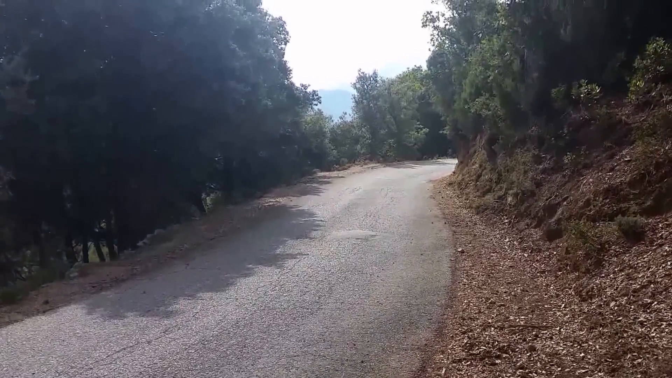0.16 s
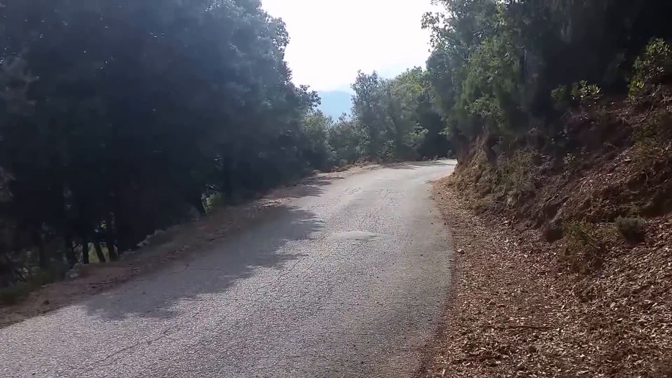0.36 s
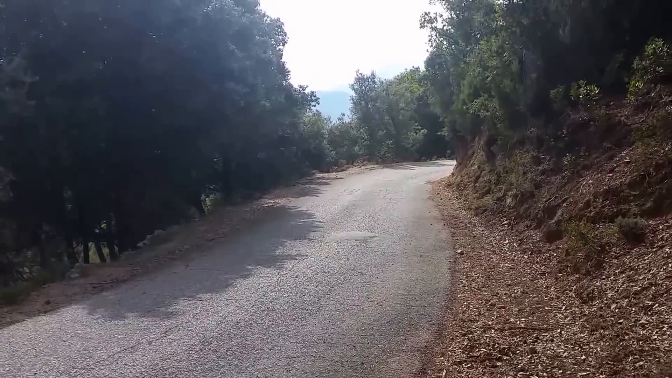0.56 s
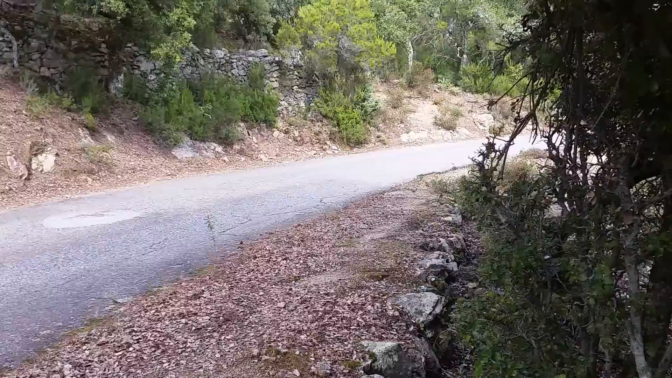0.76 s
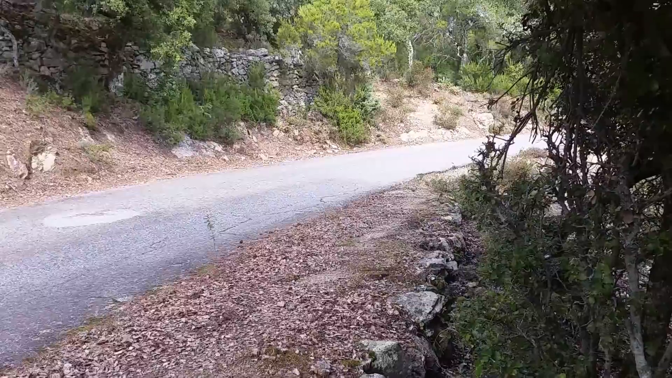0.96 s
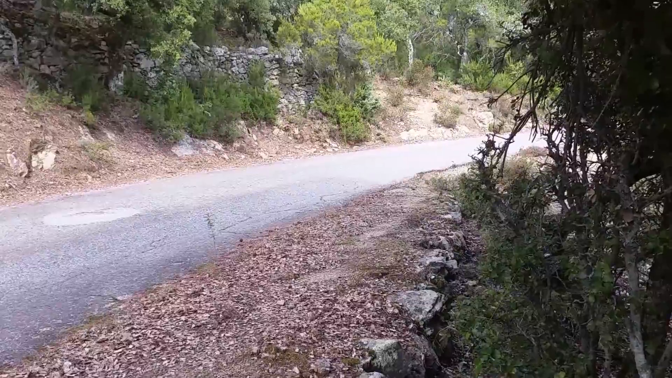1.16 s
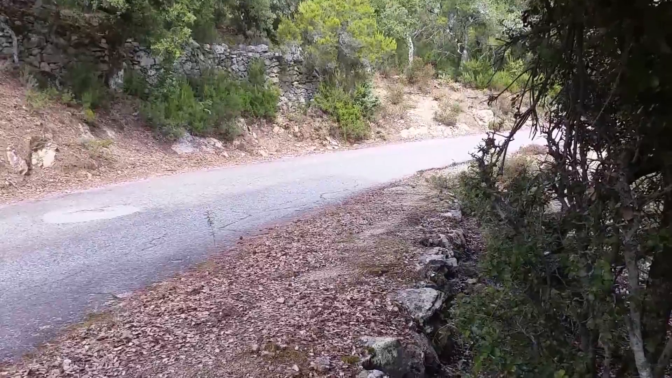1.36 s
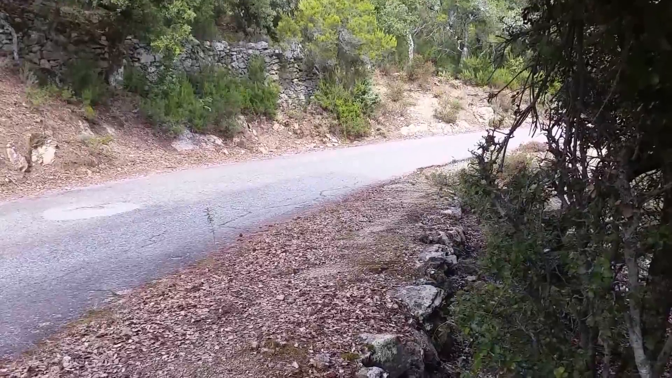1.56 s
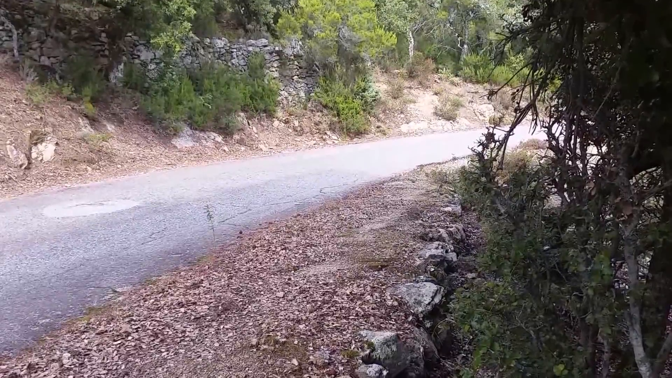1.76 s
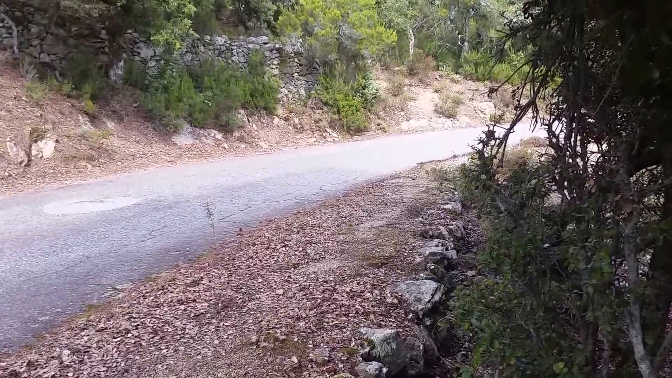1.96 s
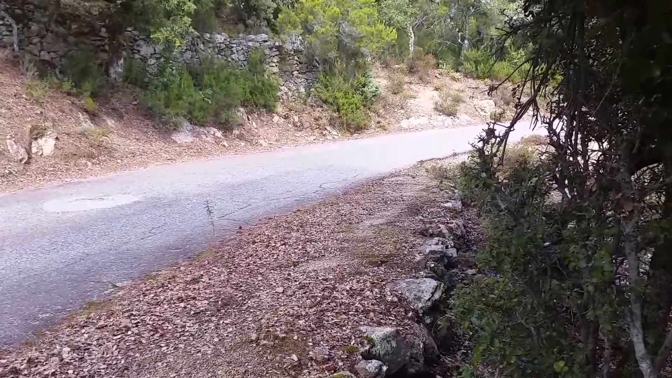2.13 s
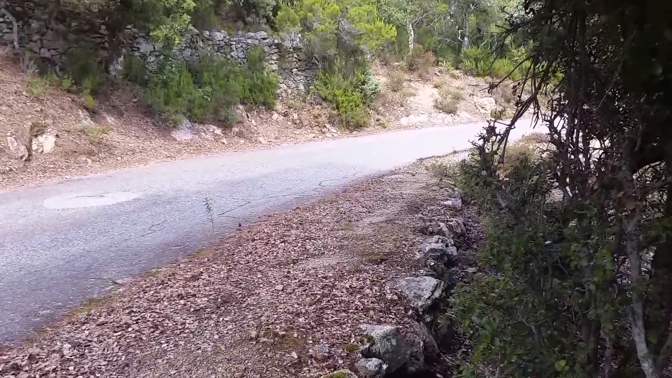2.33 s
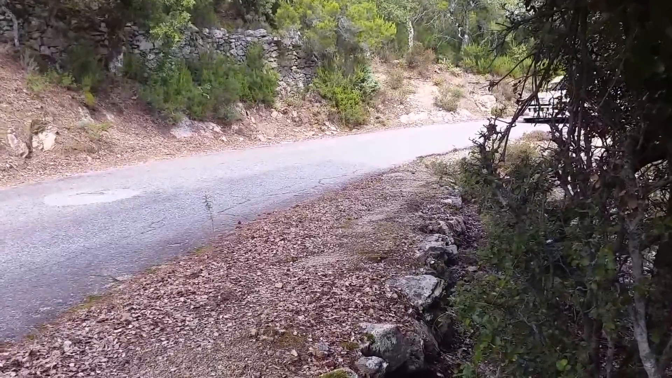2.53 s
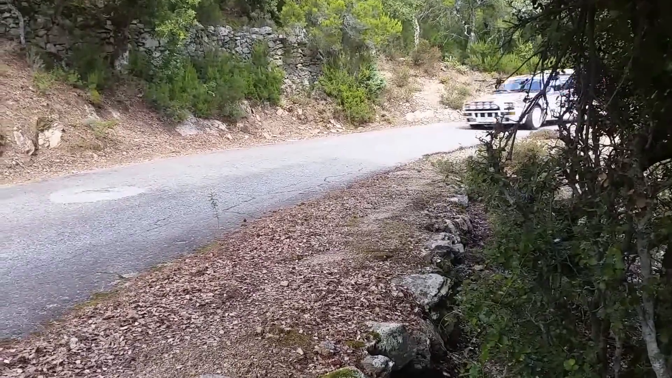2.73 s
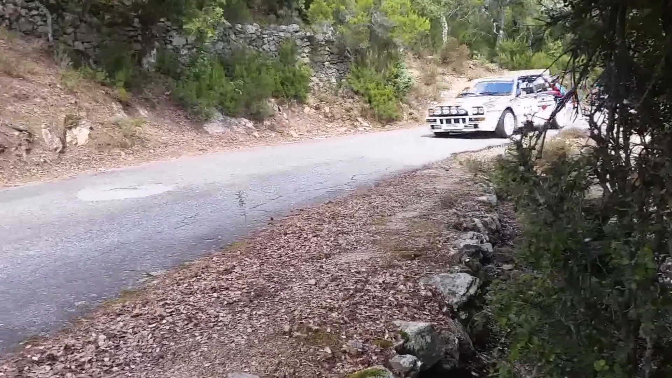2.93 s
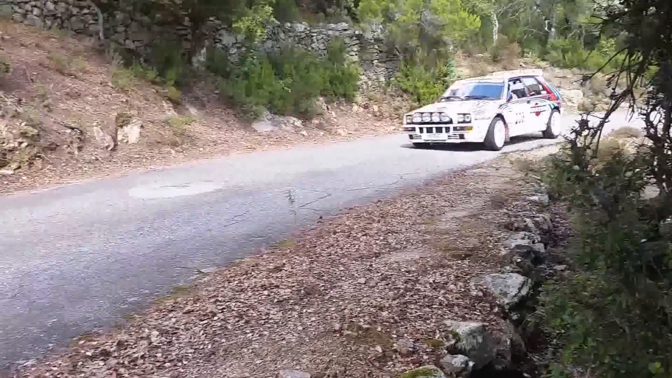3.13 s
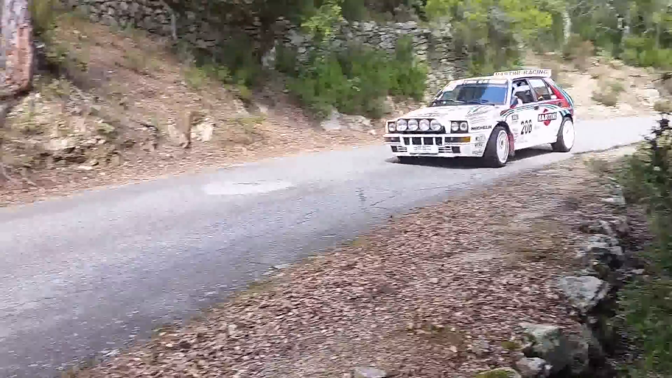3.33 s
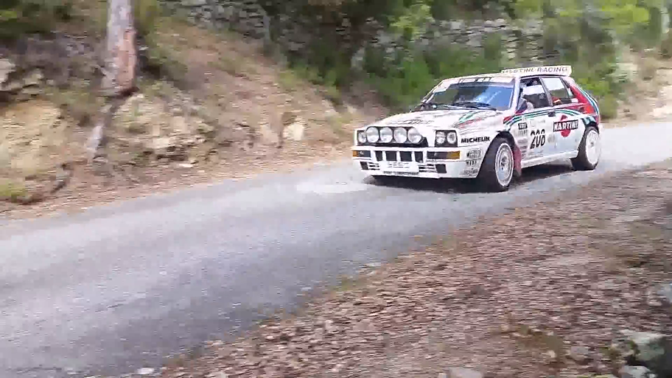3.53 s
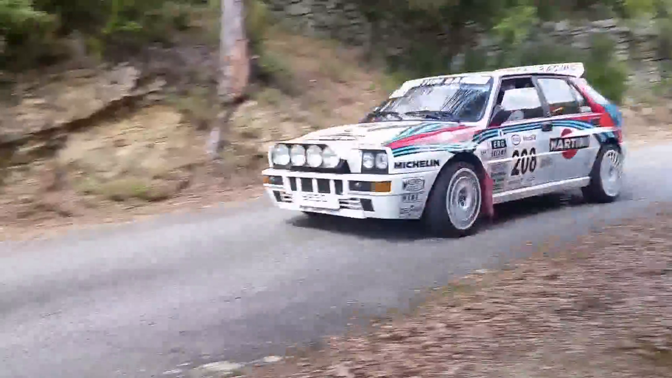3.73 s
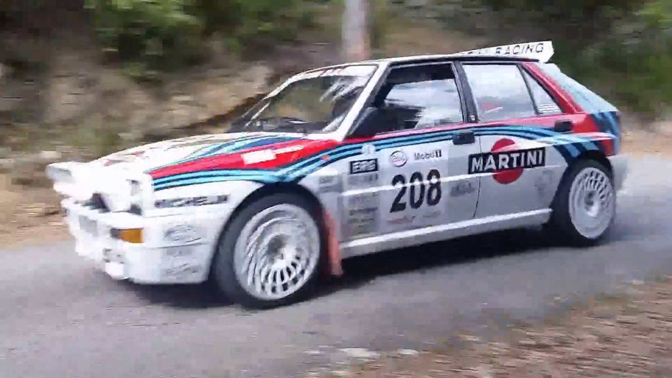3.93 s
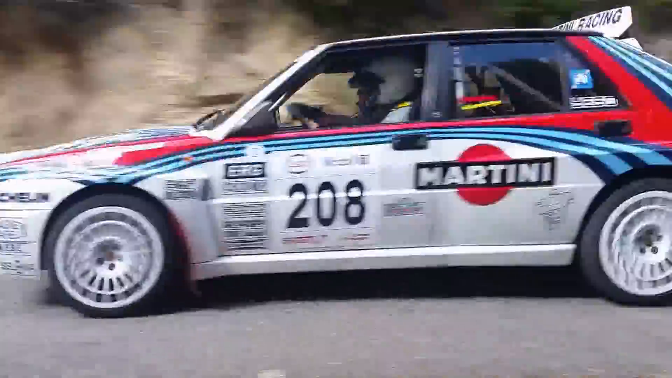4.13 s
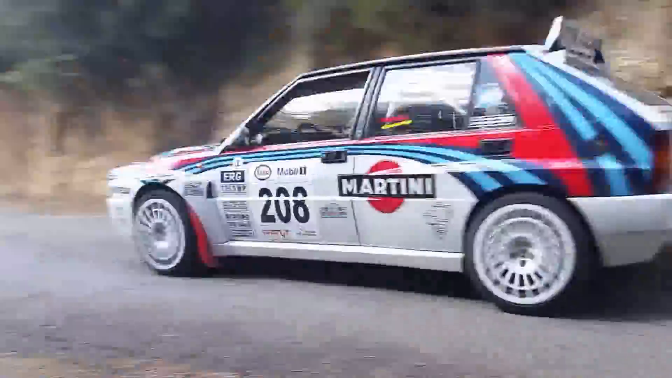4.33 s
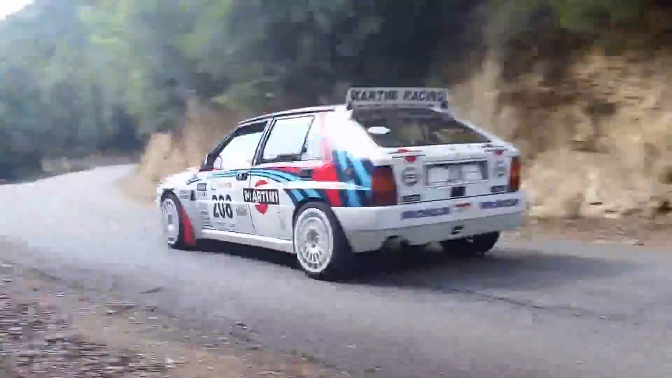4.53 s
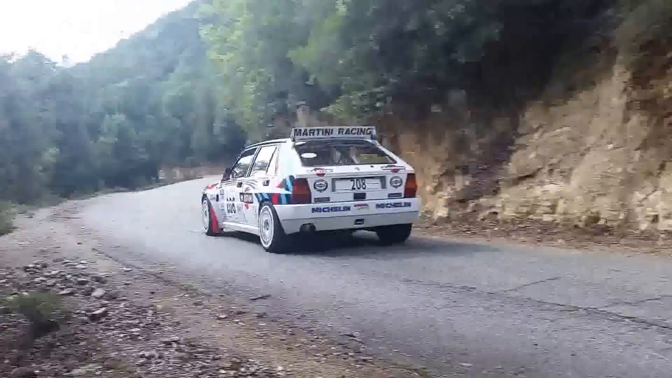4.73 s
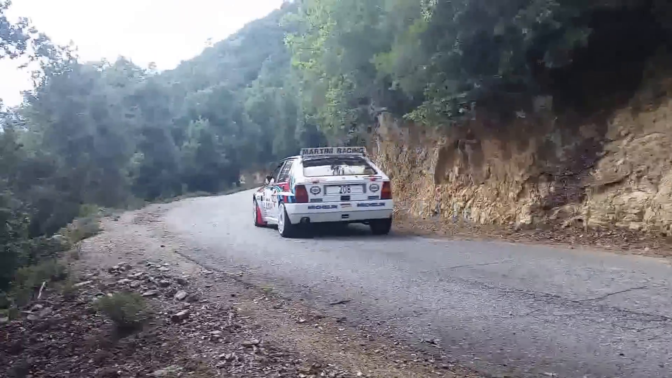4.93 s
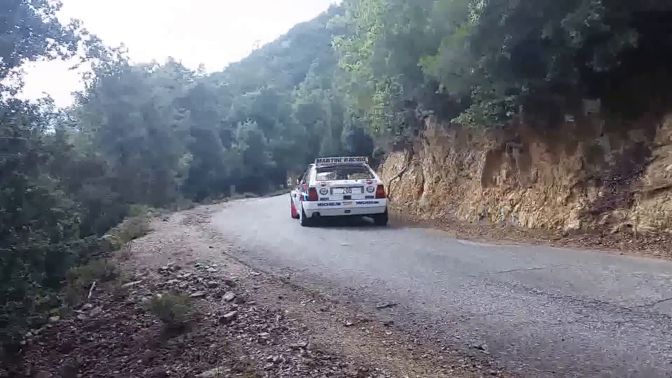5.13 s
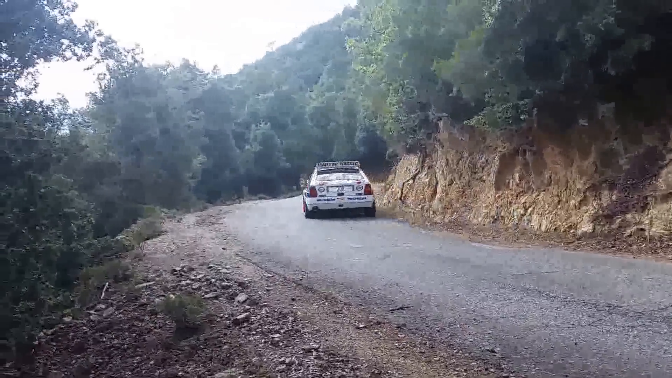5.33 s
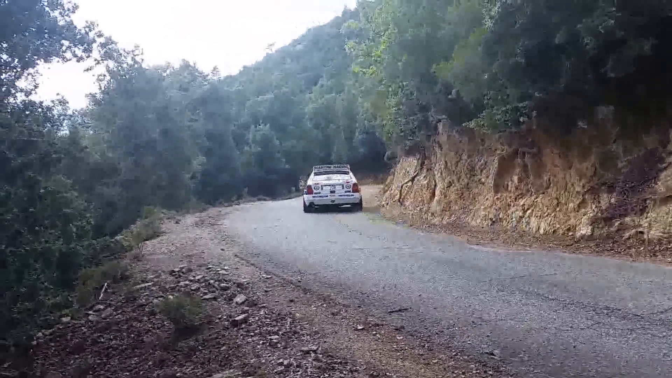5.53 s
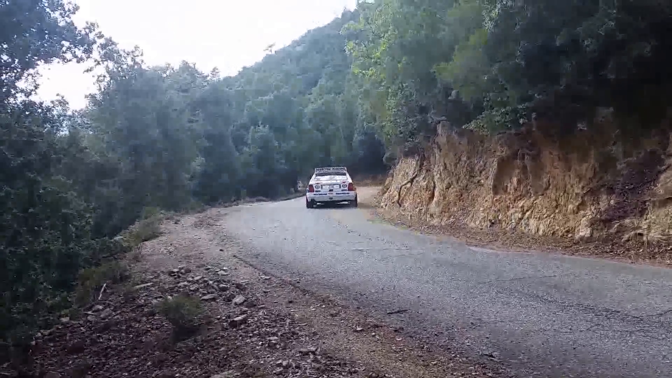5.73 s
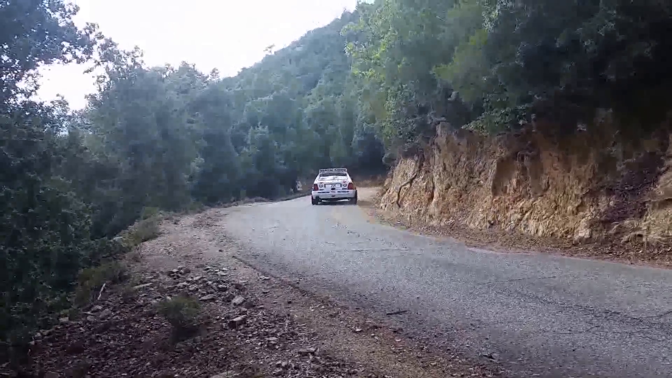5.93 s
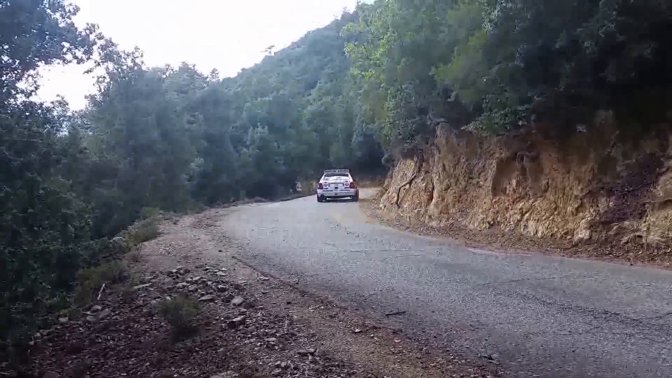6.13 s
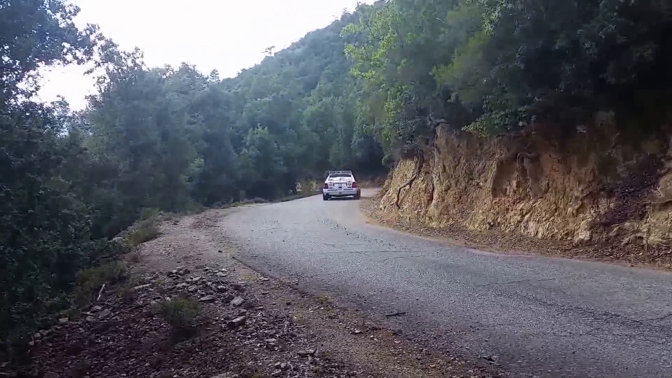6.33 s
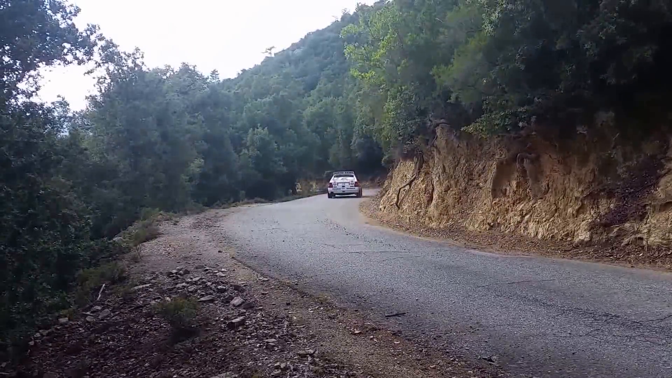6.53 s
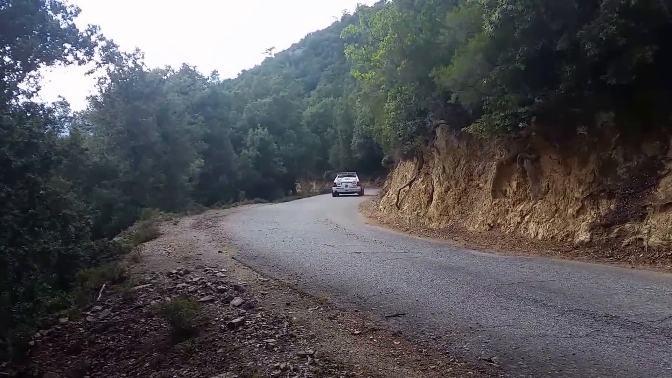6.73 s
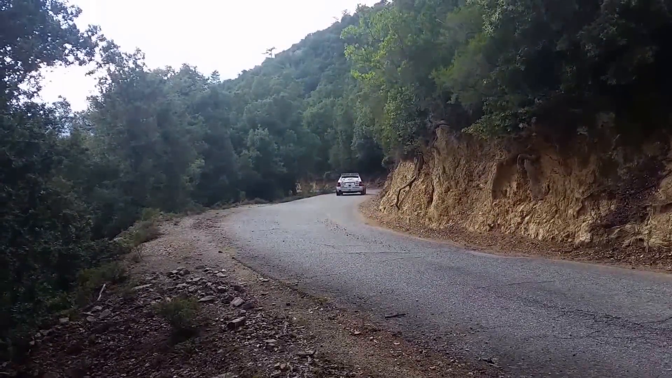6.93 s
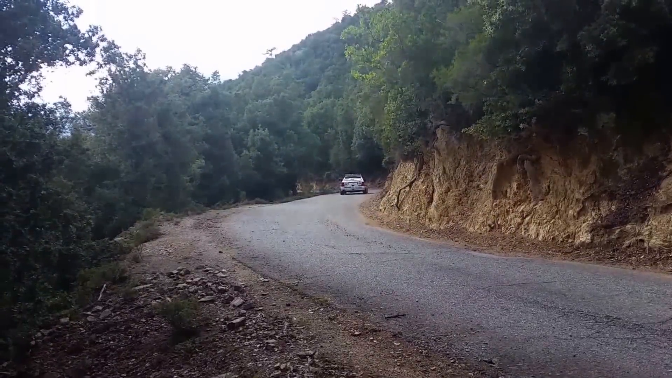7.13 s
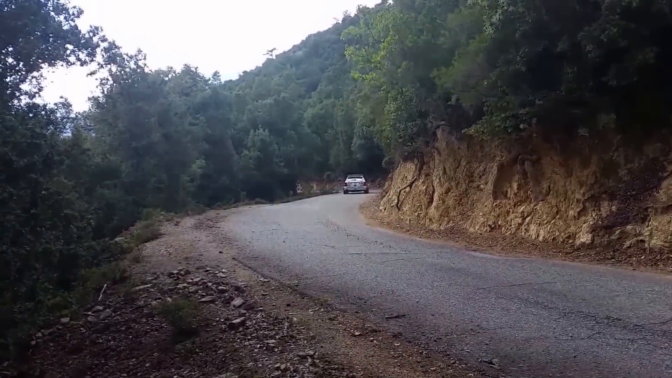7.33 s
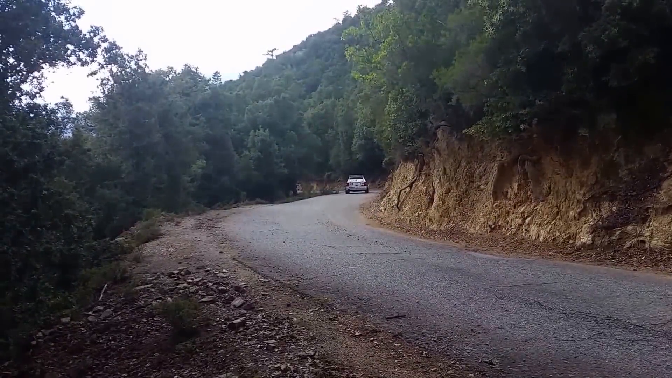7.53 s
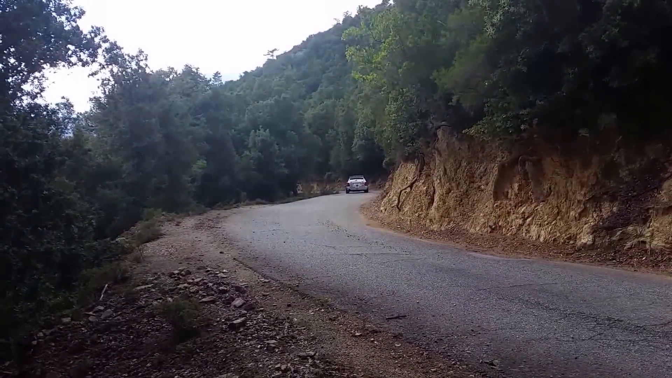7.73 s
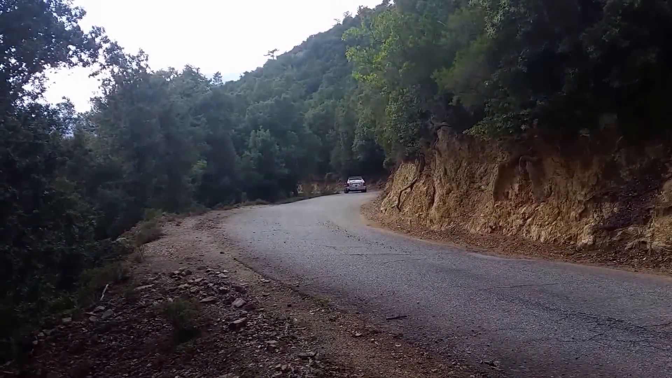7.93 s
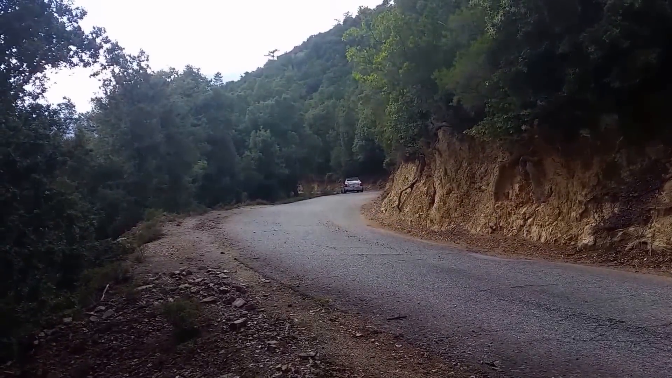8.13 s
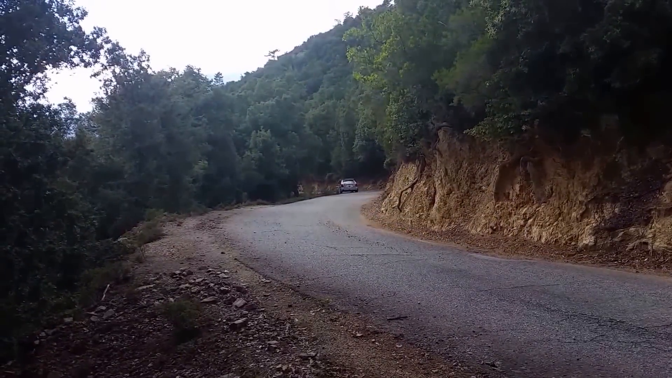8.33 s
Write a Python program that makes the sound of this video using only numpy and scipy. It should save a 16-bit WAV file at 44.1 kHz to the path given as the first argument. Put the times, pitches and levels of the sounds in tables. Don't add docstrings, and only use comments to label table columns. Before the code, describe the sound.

Raspy four-cylinder rally engine fading, a short silence, then another growls nearer, sweeps past with popping exhaust and tyre hiss, and drones off among trees.

```python
import sys
import numpy as np
from scipy import signal
from scipy.fft import rfft, irfft, next_fast_len
from scipy.io import wavfile
from scipy.ndimage import uniform_filter1d

SR = 44100
rng = np.random.default_rng(int(sys.argv[2]) if len(sys.argv) > 2 else 0)


def volts_from_db(level):
    exponent = np.asarray(level, float) / 20
    return 10 ** exponent


def generate_wav(signal):
    frames = np.transpose(np.atleast_2d(signal))
    scaled = np.clip(frames, -1, 1) * 32767
    pcm = np.round(scaled).astype(np.int16)
    wavfile.write(sys.argv[1], SR, pcm)


N = 373956
T = np.arange(N) / SR

# start/s, end/s
CUT_S = (.667, 1.)
# start/s, end/s
ABREAST_S = (3.9, 4.5)
CYLINDERS_DB = [5, -10, -15.5, -7, 7.5, 6.5, -23.5, -2.5]
# t/s, level/dB, fullness of low orders/dB, road echo swing from first to second order/dB
FIRST_DRIVE = [(0, -27, 6, -0.5), (.16, -32, 6, -0.5), (.24, -33.5, 3.5, 1), (.43, -37.5, 3.5, -1.5),
               (.5, -34.5, 0, 0), (.667, -33.5, 2.5, -4)]
SECOND_DRIVE = [(1.08, -40, 7.5, -3.5), (1.29, -29.5, 1.5, -9.5), (1.7, -29.5, 3, -7),
                (2.5, -23.5, 2.5, -3), (2.85, -26, 4, -9), (3.1, -24.5, 6.5, -2), (3.55, -18, 0.5, 0),
                (4.05, -17, 3, -3.5), (4.35, -13.5, -2, 1), (4.73, -16, 1, -1), (5.3, -19, 1.5, 5),
                (5.68, -22.5, 1.5, 2), (5.75, -24, 2.5, -4), (6.18, -23.5, -2, -5.5), (6.44, -20, -10, -10),
                (7.0, -20, -8, -6), (7.25, -21, -4, 6.5), (8.48, -26.5, -1.5, .5)]
# f/Hz, correlation/1
SAME = [(60, 0.99), (150, 0.97), (380, 0.94), (950, 0.8), (2380, 0.56), (5980, 0.2), (15000, -0.03)]


def smoothed(x, span):
    return uniform_filter1d(uniform_filter1d(x, span), span)


def evened(x, span=None):
    power = smoothed(x ** 2, span) if span else np.mean(x ** 2)
    return x / np.sqrt(abs(power) + 1e-20)


def read(points, hz):
    f, value = np.transpose(points)
    return np.interp(np.log(hz + 1), np.log(f + 1), value)


def columns(*tables):
    s, *cols = np.transpose(np.concatenate(tables))
    return np.array([np.interp(T, s, c) for c in cols])


def bump(s, half_s):
    near = slice(max(round((s - 3 * half_s) * SR), 0), round((s + 3 * half_s) * SR))
    return near, np.exp(-((T[near] - s) / half_s) ** 2)


def likened(left, other, same):
    return np.array([left, same * left + np.sqrt(1 - same ** 2) * other])


def pair(frames, hz):
    a, b, c, d = rng.standard_normal((frames, len(hz), 4)).T
    same = np.clip(read(SAME, hz), -1, 1)[:, None]
    return likened(a + 1j * b, c + 1j * d, same)


def resonate(x, hz, width_hz):
    turn = np.exp(2j * np.pi * np.cumsum(hz) / SR)
    r = np.exp(-np.pi * width_hz / SR)
    return 2 * (turn * signal.lfilter([1 - r], [1, -r], x / turn)).real


def cranked():
    # t/s, f/Hz
    first_rate = [(0, 119.7), (.15, 122), (.67, 124.4)]
    second_rate = [(1.0, 105.7), (1.3, 104.0), (2.15, 101.2), (2.35, 102.4), (2.65, 106.3), (2.95, 106.0),
                   (3.2, 104.0), (3.85, 103.6), (4.1, 102.2), (4.33, 103.9), (4.68, 100.8), (5.5, 109.2),
                   (5.9, 110.0), (6.1, 108.8), (6.85, 107.2), (7.0, 106.1), (7.45, 107.7), (8.48, 115.9)]
    # t/s, half length/s, added rate/Hz
    twitch = [(1.44, 0.061, 1), (2.221, 0.0493, 2.5), (2.43, 0.0608, 2.5), (2.876, 0.0696, 2),
              (3.303, 0.098, .5), (3.493, 0.02934, 8), (4.371, .04, 2.5), (4.483, 0.0387, -3.5),
              (5.385, .08, 1), (5.778, .06, -5), (5.923, .04, 1.5), (6.03, .04, -1.5), (7.268, .05, 4),
              (7.521, 0.062, 1.5), (7.722, 0.039, 0.5)]
    hz = columns(first_rate, second_rate)[0]
    for s, half_s, extra_hz in twitch:
        near, shape = bump(s, half_s)
        hz[near] += extra_hz * shape
    return np.cumsum(hz) / SR


def firings():
    strong_firing_s = [.516, 6.676]
    turns = cranked()
    first, second = (turns[round(s * SR)] for s in strong_firing_s)
    count = np.floor(turns - np.where(T < CUT_S[0], first, second)).astype(int)
    at = np.flatnonzero(np.diff(count) == 1) + 1
    return at, count[at] % 4 + 4 * (T[at] > CUT_S[0])


def spells():
    # start/s, cylinder imbalance/1, misfire scatter/dB, share by way of bank and trees/1
    running = [(0, 1, 3.5, .55), (.215, .1, 1, .6), (.465, 1.4, 1, .62), (.8, .3, 3.8, .8),
               (2.78, .2, 2.2, .75), (3.43, .4, 5.5, .52), (4.3, .25, 1.6, .48), (4.8, .3, 1.2, .4),
               (5.68, .55, 1.4, .5), (6.3, .5, 5, .52), (6.45, .8, 3, .35), (6.54, 1.1, .5, .12),
               (6.95, .4, 2, .43), (7.23, .22, 1, .6)]
    change_s = .05
    s, *cols = np.transpose(running)
    held = np.array(cols)[:, np.searchsorted(s, T, "right") - 1]
    return uniform_filter1d(held, round(change_s * SR))


def levels():
    # t/s, level/dB
    rasp = [(0, -10.5), (.4, -9.5), (.66, -15), (1.2, -11), (2.6, -7), (3, -4), (4, -8.5), (4.4, -15),
            (4.75, -12), (5.2, -9), (6.4, -8), (6.9, -4), (7.2, -6), (7.6, -2), (8.48, -2.5)]
    # t/s, half length/s, first order/dB, second order/dB
    beats = [(0.09, 0.039, -1.5, -10.5), (0.515, 0.04, 9, -4), (1.164, 0.077, -0.5, -1.5),
             (1.483, 0.071, -8, -2.5), (1.544, 0.023, 8.5, 6.5), (1.599, 0.064, -2.5, -12),
             (1.828, 0.054, 3, 0), (2.088, 0.078, 1, -3.5), (2.22, 0.041, -3.5, 9), (2.359, 0.018, 4, -38),
             (2.543, 0.026, 5, -7), (2.633, 0.093, -7, -1.5), (2.987, 0.022, -6.5, 4),
             (3.05, .03, -3.5, -6), (3.447, 0.051, -12, 1.5), (3.498, 0.012, 16, 9),
             (3.508, 0.033, -2.5, -26), (3.594, .03, -3, -5), (3.71, 0.041, -0.5, -11.5),
             (3.865, 0.02, -12, -5), (3.972, 0.024, -4, 1.5), (4.01, 0.019, -2.5, -18),
             (4.207, 0.062, 1.5, -5.5), (4.367, 0.03, -3, 5.5), (4.896, 0.073, -6.5, -2),
             (5.174, 0.12, 3, -7), (5.31, 0.033, -13, -1), (5.778, 0.0053, -6.5, 9), (5.956, 0.051, -3, -8),
             (6.98, 0.011, 9, 15), (7.013, .015, 2.5, -8.5), (7.19, 0.0082, 13.5, -3.5),
             (7.308, 0.041, 0, -8)]
    pipe_yields_db, even_below_db = -12, 2.5
    level_db, full_db, swing_db = columns(FIRST_DRIVE, SECOND_DRIVE)
    low_db = level_db + full_db + np.array([-swing_db, swing_db])
    for s, half_s, *db in beats:
        near, shape = bump(s, half_s)
        low_db[:, near] += np.outer(db, shape)
    imbalance, scatter_db, _ = spells()
    even = np.clip(1 - scatter_db / even_below_db, 0, 1) * np.clip(1 - imbalance, 0, 1)
    even = even * (T > CUT_S[1])
    return *low_db, level_db + pipe_yields_db * even, level_db + columns(rasp)[0]


def causal(points, modes):
    hz = abs(np.fft.fftfreq(8192, 1 / SR))
    gain_db = read(points, hz)
    for f, width, db in modes:
        gain_db = gain_db + db / (1 + (2 * (hz - f) / width) ** 2)
    log_gain = np.log(volts_from_db(np.maximum(gain_db, -100)))
    return np.fft.ifft(np.exp(np.conj(signal.hilbert(log_gain)))).real[:4096]


def colour(clicks):
    # f/Hz, density/dB
    first_view = [(29, -36.5), (50, -13), (128, -24), (207, -13.5), (218, -21), (242, -5.5), (324, -24),
                  (384, -19.5), (456, -21.5), (497, -13), (688, -33.5), (936, -26), (3000, -43),
                  (3900, -75), (6600, -120)]
    front_view = [(15, -57.5), (40, -18.5), (85, 3), (170, -2), (250, -3.5), (600, -15.5), (1080, -30.5),
                  (3200, -44.5), (4200, -78.5), (7000, -120)]
    rear_view = [(15, -56), (40, -32.5), (96, -8), (160, -4.5), (212, 12), (300, -5.5), (640, -7),
                 (800, -14), (1600, -18.5), (2300, -28), (3300, -40.5), (5000, -42.5), (6200, -81),
                 (9000, -120)]
    # f/Hz, width/Hz, gain/dB
    front_modes = [(440, 29, 7), (333, 140, -0.5), (892, 110, 5.5), (1900, 2600, 10.5), (161, 28, -10),
                   (74.4, 80, -6.5)]
    rear_modes = [(73, 19, -8), (158, 52, -10.5), (270, 25, -1), (398, 37, 1.5), (600, 73, 0.5),
                  (746, 39, -11), (1090, 270, -4), (1164, 120, 7.5), (2714, 292, -30.5)]
    views = (first_view, []), (front_view, front_modes), (rear_view, rear_modes)
    first, front, rear = (evened(signal.oaconvolve(clicks, causal(*v))[:N]) for v in views)
    behind = np.interp(T, ABREAST_S, [0, 1])
    return np.where(T < CUT_S[0] + .1, first, (1 - behind) * front + behind * rear)


def band(x, order):
    band_edges_hz = [165, 250, 750]
    size = next_fast_len(N + SR // 2)
    octave = np.log2(np.fft.rfftfreq(size, 1 / SR) + 1)
    slopes = [1 / (1 + np.exp(-(octave - np.log2(e)) * 25)) for e in band_edges_hz]
    above = [1] + slopes + [0]
    return irfft(rfft(x, size) * (above[order] - above[order + 1]), size)[:N]


def road_echo(direct):
    # t/s, f/Hz
    ground = [(1, 340), (1.9, 397), (2, 487), (2.7, 500), (3.4, 406), (4.12, 488), (4.24, 286), (4.55, 295),
              (4.65, 698), (5.66, 687), (5.7, 444), (6.2, 457), (6.9, 523), (7.15, 552), (7.3, 442),
              (8.48, 493)]
    # t/s, f/Hz, depth/1
    ground_dip = [(1, 340, 0.2), (1.9, 330, 0.2), (2.2, 373, 0.7), (2.9, 382, 0), (4.2, 370, 0.4),
                  (4.4, 373, 0.7), (5.65, 373, 0.9), (5.8, 345, 0), (6.4, 331, 0.3), (6.55, 315, .85),
                  (6.93, 313, 0.4), (7, 328, 0), (7.2, 360, 0), (7.28, 380, 0.7), (8.48, 394, 0.7)]
    second_car = T > CUT_S[0]
    direct = direct + 0.85 * resonate(direct, columns(ground)[0], 100) * second_car
    hz, depth = columns(ground_dip)
    return direct - depth.clip(0, 1) * resonate(direct, hz, width_hz=65) * second_car


def bank_echo(direct):
    # t/s, f/Hz, gain/1
    bank = [(0, 994, 0.063), (1, 963, 0.057), (2.2, 890, 0.12), (3.4, 1370, 0.66), (3.6, 1900, 0.34),
            (4.1, 2110, 0.15), (4.3, 980, 0.46), (4.55, 1010, 0.78), (4.75, 1540, 0.23), (5.6, 1300, 0.52),
            (6.3, 1160, 0.58), (6.55, 1450, 1), (6.93, 1560, 3.2), (6.97, 1190, 1.2), (7.3, 1340, 1.2),
            (7.5, 1430, 3.3), (8.1, 1320, 1), (8.48, 1600, .6)]
    hz, gain = columns(bank)
    return direct + gain * resonate(direct, hz, width_hz=380)


def tree_echoes():
    # f/Hz, t60/s
    trees = [(100, 0.58), (500, 0.57), (2500, 1)]
    hz, t = np.fft.rfftfreq(512, 1 / SR), np.arange(110) * 128 / SR
    decay = volts_from_db(-60 * t / read(trees, hz)[:, None])
    return signal.istft(pair(len(t), hz) * decay, nperseg=512, noverlap=384)[1]


def exhaust(at, cylinder):
    branch_delay = [-4.5, -2.5, 21.5, -12, 0.5, -4, 51, -30.5]
    # t/s, peak/dB
    pops = [(0.015, -19), (0.114, -28), (1.536, -24), (3.471, -11), (3.634, -11), (4.32, -10), (4.97, -10),
            (5.047, -9), (5.946, -19), (6.084, -14), (6.305, -18), (6.377, -10), (6.426, -11), (6.534, -12),
            (6.96, -6), (7.055, -6), (7.093, -6), (7.142, -11), (7.19, -8)]
    band_feel = [0.58, 0.58, 0.98, .9]
    band_smear = [.25, 0.302, 0.848, 1.251]
    pop_feel = [.12, .25, 1, 1.2]
    crack_jitter = 9
    imbalance, scatter_db, smear = spells()
    chance = rng.standard_normal((len(at), 3)).T
    strength_db = imbalance[at] * np.take(CYLINDERS_DB, cylinder) + scatter_db[at] * chance[0]
    slip = np.take(branch_delay, cylinder) + 4.5 * scatter_db[at] * chance[1]
    pop_s, pop_db = np.transpose(pops)
    pop_at = np.round(pop_s * SR).astype(int)
    tails = [tree_echoes(), tree_echoes()]
    drift = [np.cos(np.pi * (3.3 * T + k / 2)) for k in range(2)]
    out = np.zeros((2, N))
    for k, level_db in enumerate(levels()):
        clicks, feel = np.zeros(N), band_feel[k]
        shift = feel * slip
        if k == 3:
            shift = shift + crack_jitter * smear[at] * chance[2]
        fired_at = np.clip(at + np.round(shift).astype(int), 0, N - 1)
        np.add.at(clicks, fired_at, volts_from_db(feel * strength_db))
        clicks[pop_at] += pop_feel[k] * volts_from_db(pop_db + 22.5)
        direct = band(colour(clicks), order=k)
        if k == 2:
            direct = road_echo(direct)
        if k == 3:
            direct = bank_echo(direct)
        direct = evened(direct, span=2600)
        wet = np.zeros((2, N))
        for weight, tail in zip(drift, tails):
            wet += signal.oaconvolve((direct * weight)[None], tail, axes=1)[:, :N]
        share = np.clip(band_smear[k] * smear, 0, 1)
        mix = np.sqrt(1 - share) * direct + np.sqrt(share) * evened(wet, span=2600)
        out += volts_from_db(level_db) * evened(mix, span=2600)
    return out


def drone():
    # start/s, end/s, multiple of firing rate/1, level against pipe/dB
    orders = [(.1, .5, 4, -6), (0, .47, 5, -15), (1.1, 1.6, 2.5, -10), (1.6, 1.95, 2.75, -8),
              (1.15, 1.55, 3.75, -8), (1.62, 2.18, 3.75, -5), (1.9, 2.3, 4.25, -4), (2.4, 2.75, 4.25, -7),
              (2.3, 2.7, 5, -13), (2.25, 2.75, 3, -13), (3.85, 4.68, 2.75, -6.5), (3.2, 3.9, 2.75, -15),
              (3.15, 3.75, 3.75, -10), (2.9, 3.3, 4, -13), (4.6, 5.15, 2.75, -9), (4.3, 5.7, 2.25, -13),
              (4.3, 5.75, 3, -11), (4.35, 5.3, 6, -14), (4.65, 5.72, 6.25, -13), (4.55, 5.35, 6.5, -16),
              (4.65, 5.5, 5.25, -15), (4.85, 5.72, 4, -11), (4.9, 5.72, 4.5, -14), (5.08, 5.74, 4.25, -8),
              (4.25, 4.9, 4.75, -15), (5.1, 6.3, 2.75, -12), (5.7, 6.3, 1.25, -6.5), (5.7, 6.3, 2.5, -11),
              (5.85, 6.95, 2.25, -13), (5.8, 6.45, 4, -11), (5.9, 6.5, 3.5, -12), (5.8, 6.4, 5, -11),
              (6.33, 6.97, 5, -5), (6.3, 7.1, 3.75, -7), (6.3, 7.2, 5.25, -14), (6.6, 7.3, 5.5, -13),
              (7.22, 8.6, 1.25, -17.5), (7.25, 8.6, 2.25, -12), (7.45, 8.6, 2.5, -14),
              (7.25, 8.2, 2.75, -10), (7.4, 8.6, 3, -11), (6.97, 8.6, 4, -8), (7.28, 8.6, 4.25, -6),
              (7, 8.3, 4.5, -13), (7.9, 8.6, 4.75, -15), (7.2, 7.75, 5, -14), (7.82, 8.6, 5.25, -8),
              (7.3, 7.9, 5.5, -16), (7.45, 7.95, 6.25, -15), (7.25, 8.6, 11, -13.5)]
    fade_s, waver_db, wobble_rad = 0.063, 2, .3
    turns = cranked()
    wavers = evened(uniform_filter1d(rng.standard_normal((len(orders), 140)), 8))
    out = np.zeros(N)
    for (start, end, multiple, db), waver in zip(orders, wavers):
        on = slice(round(start * SR), round(end * SR))
        fade = np.clip(np.minimum(T[on] - start, end - T[on]) / fade_s, 0, 1)
        w = np.interp(T[on] - start, np.arange(len(waver)) * 512 / SR, waver)
        quarter = np.round(4 * multiple) / 4
        phase = 2 * np.pi * quarter * turns[on] + waver[0] + wobble_rad * w[::-1]
        out[on] += fade * volts_from_db(db + waver_db * w) * np.sin(phase)
    return volts_from_db(columns(FIRST_DRIVE, SECOND_DRIVE)[0] + 2.5) * out


def ticks():
    # t/s, peak/dB, f/Hz, bandwidth/Hz, t60/s
    bursts = [(.085, -36, 5200, 3000, .08), (2.198, -36, 3300, 250, .12), (7.392, -42, 6300, 5000, .06),
              (7.392, -54, 11500, 6000, .03), (7.496, -44, 6300, 4000, .02), (6.375, -18, 540, 200, .2),
              (6.525, -19, 250, 90, .2), (6.435, -13, 520, 200, .2), (6.952, -15, 1200, 300, .18),
              (3.468, -19, 1200, 250, .12), (3.47, -12, 420, 200, .3), (7.135, -13, 560, 200, .25),
              (1.44, -26, 55, 40, .25), (3.46, -15, 145, 60, .25), (3.71, -17, 70, 50, .25),
              (3.88, -15, 70, 50, .2), (3.97, -18, 150, 70, .35), (4.03, -17, 65, 50, .25),
              (4.19, -14, 70, 50, .25), (5.68, -26, 62, 40, .2), (6.25, -22, 60, 40, .3),
              (6.36, -25, 170, 70, .3), (7.1, -22, 60, 40, .3)]
    out, t = np.zeros((2, N)), np.arange(9000) / SR
    for s, peak_db, hz, width_hz, t60_s in bursts:
        noise = evened(smoothed(rng.standard_normal((2, len(t))), int(SR / width_hz)))
        noise = likened(*noise, read(SAME, hz))
        attack = np.minimum(t / max(0.0029, 1 / hz), 1) ** 2
        burst = volts_from_db(peak_db - 60 * t / t60_s) * noise * np.sin(2 * np.pi * hz * t) * attack
        out[:, round(s * SR):][:, :len(t)] += burst
    return signal.sosfilt(signal.butter(2, 45, "high", fs=SR, output="sos"), out)


def placed(x):
    # t/s, left lag/samples, left-right/dB
    side_on = [(0, 1, 0), (.67, 0, 0), (1, 10, 0), (1.7, 11, -.2), (3.2, 3, -.3), (4.2, -3, 0), (4.7, 3, 0),
               (5.2, 0, 0), (8.48, 0, .6)]
    lag, pan_db = columns(side_on)
    left = np.interp(np.arange(N) - lag, np.arange(N), x[0])
    return np.array([left, x[1]]) * volts_from_db([pan_db / 2, -pan_db / 2])


def tyre_and_bay_hiss(at, cylinder):
    # t/s, level/dB
    first_near = [(0, -56), (.024, -53.5), (.474, -71), (.667, -72)]
    second_near = [(1.05, -102), (1.3, -85), (1.4, -80), (2.14, -66), (2.23, -60.5), (3.24, -43.5),
                   (3.48, -43), (3.56, -41), (3.88, -38), (4.31, -42.5), (4.5, -51.5), (4.8, -51),
                   (5.48, -59.5), (6, -63.5), (6.6, -68), (7, -71), (7.14, -66), (8.48, -75)]
    # nearness/dB, hiss/dB
    roar = [(-99, -71), (-82, -62), (-76.5, -56), (-63.5, -54), (-41.5, -40), (-35, -33.5)]
    # f/Hz, density/dB
    hiss_front = [(1560, -13.5), (2650, -7.5), (3330, -0.5), (4570, 4.5), (5420, 2), (6400, -16),
                  (8320, -45), (14100, -120)]
    hiss_rear = [(1560, -36.5), (2650, -4.5), (3000, 3), (3210, -2.5), (4230, 1), (5110, -2.5),
                 (5460, -0.5), (5900, -19), (6400, -30.5), (8320, -47.5), (14100, -120)]
    fizz_near = [(3410, -26.5), (5800, 3), (6430, -13), (7190, -2.5), (10400, -1.5), (15100, -2),
                 (15700, 3.5), (16200, -30.5)]
    fizz_far = [(3650, -27.5), (6200, -12), (7220, -10.5), (8870, -26.5), (10500, -32), (12400, -33.5),
                (15100, -30.5), (16200, -31)]
    # far/dB, near/dB
    fizz_turn_db = (-59.5, -32)
    hz, frames = np.fft.rfftfreq(512, 1 / SR), N // 128 + 5
    frame_at = np.arange(frames) * 128
    fizz_db = columns(first_near, second_near)[0, np.minimum(frame_at, N - 1)]
    hiss_db = np.interp(fizz_db, *np.transpose(roar))
    near = np.interp(fizz_db, fizz_turn_db, [0, 1])
    behind = np.interp(frame_at / SR, ABREAST_S, [0, 1])
    curves = fizz_near, fizz_far, hiss_front, hiss_rear
    near_gain, far_gain, front, rear = (evened(volts_from_db(read(c, hz)))[:, None] for c in curves)
    body = (1 - behind) * front + behind * rear
    fizz = near * near_gain + (1 - near) * far_gain
    shape = np.hypot(body * volts_from_db(hiss_db), fizz * volts_from_db(fizz_db))
    grain = rng.standard_normal((frames, len(hz)))
    patches = evened(uniform_filter1d(uniform_filter1d(grain, 16, 0), 8, 1)).T
    spectra = pair(frames, hz) * shape * volts_from_db(1.4 * patches)
    noise = signal.istft(spectra, nperseg=512, noverlap=384)[1][:, :N]
    clicks = np.zeros(N)
    clicks[at] = rng.exponential(1, len(at))
    throb = 1 + 0.39 * signal.lfilter([1], [1, -.99], clicks)
    clicks[at] = spells()[0, at].clip(0, 1) ** 4 * volts_from_db(np.take(CYLINDERS_DB, cylinder))
    spit = 3.5 * signal.lfilter([1], [1, -.975], clicks)
    lowpass = signal.butter(8, 5200, fs=SR, output="sos")
    dull = signal.sosfilt(lowpass, noise * spit * (T > CUT_S[1]))
    return volts_from_db(-21.0) * (noise * uniform_filter1d(throb, 40) + dull)


def heat_shield_rattle(at):
    # start/s, length/s, level/dB, mode f/Hz, place of the peak/1
    bouts = [
        (4.427, 0.39, -37.5, 2300, 0.3),
        (4.502, 0.2, -37, 5170, 0.7),
        (4.677, 0.053, -34.5, 5330, 0.2),
        (4.723, 0.11, -41.5, 5180, 0.2),
        (4.724, 0.082, -43, 3890, 0.6),
        (4.965, 0.067, -47, 5330, 0.4),
        (3.48, 0.54, -40.5, 4200, 0.5),
        (2.2, 0.98, -47.5, 2300, 0.4),
        (1.324, 0.61, -73, 7440, 0.5),
        (2.505, 0.67, -65.5, 15000, 0.4),
    ]
    edge_db, sag = -12, .14
    clicks, out = np.zeros(N), np.zeros((2, N))
    clicks[at] = volts_from_db(1.5 * rng.standard_normal(len(at)))
    swell = .25 + signal.oaconvolve(clicks, signal.windows.hann(330) ** 2)[90:N + 90]
    wobble = 1.7 * evened(smoothed(rng.standard_normal((2, N)), 60))
    for start, length, db, hz, peak in bouts:
        bout = slice(round(start * SR), round((start + length) * SR))
        weak = np.interp(T[bout] - start, [0, peak * length, length], [1, 0, 1]) ** 2
        phase = 2 * np.pi * np.cumsum(hz * (1 - sag * weak)) / SR
        out[:, bout] += volts_from_db(db + edge_db * weak) * np.cos(phase + wobble[:, bout])
    return volts_from_db(10.5) * swell * out


def wind_and_self_noise():
    wind_db, wind_hz, self_noise_db, self_noise_hz = -61, 45, -76.5, 11000
    low, high = rng.standard_normal((2, 2, N))
    wind = signal.sosfilt(signal.butter(3, wind_hz, fs=SR, output="sos"), low[0] + .2 * low)
    self_noise = signal.sosfilt(signal.butter(6, self_noise_hz, "high", fs=SR, output="sos"), high)
    return volts_from_db(wind_db) * evened(wind) + volts_from_db(self_noise_db) * evened(self_noise)


def scene():
    at, cylinder = firings()
    car = placed(exhaust(at, cylinder) + drone() + ticks())
    return car + tyre_and_bay_hiss(at, cylinder) + heat_shield_rattle(at) + wind_and_self_noise()


def top_cut(x):
    return signal.sosfilt(signal.butter(12, 16830, fs=SR, output="sos"), x)


def record(dry):
    # f/Hz, left-right/dB
    lean = [(60, -1.0), (92, -1.0), (140, -1.0), (210, 0.0), (330, 0.5), (500, 0.0), (770, 1.0),
            (1170, 1.0), (1790, -1.0), (2740, -2.0), (4190, -11.0), (6410, -7.0), (9810, 3.5), (15000, 0.0)]
    edge_hz, fade_in_s, fade_in_db = 15900, 0.072, -18.5
    size = next_fast_len(N + SR // 2)
    hz = np.fft.rfftfreq(size, 1 / SR)
    lean_db = read(lean, hz)
    gain = (hz < edge_hz) * volts_from_db([lean_db / 2, -lean_db / 2])
    ports = irfft(rfft(dry, size) * gain, size)[:, :N]
    limited = ports / (1 + abs(ports / .97) ** 4) ** .25
    sounding_s = np.minimum(np.maximum(CUT_S[0] - T, T - CUT_S[1]), T[-1] - T)
    gate = np.clip(sounding_s / .004, 0, 1)
    gate = gate * volts_from_db(fade_in_db * np.clip(1 - abs(T - CUT_S[1]) / fade_in_s, 0, 1))
    settling = volts_from_db(-81.0 - 380 * np.maximum(T - CUT_S[0], 0))
    silent = abs(T - sum(CUT_S) / 2) < (CUT_S[1] - CUT_S[0]) / 2
    return top_cut(gate * limited + silent * settling)


dry = scene()
out = record(dry)
generate_wav(out)
```